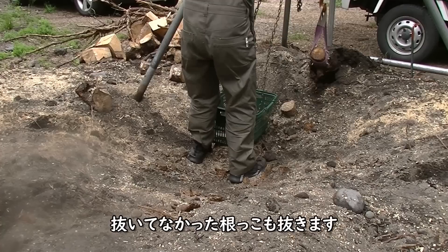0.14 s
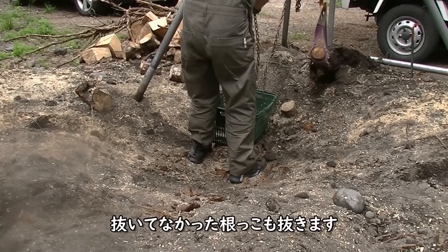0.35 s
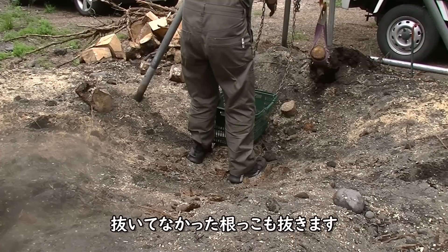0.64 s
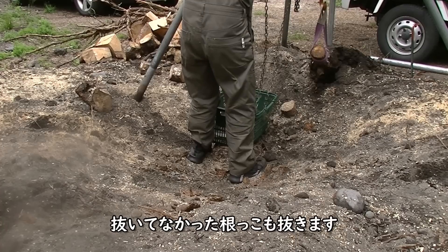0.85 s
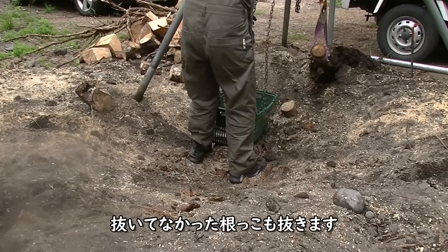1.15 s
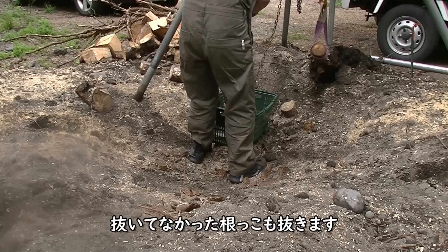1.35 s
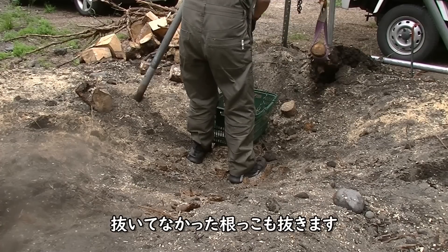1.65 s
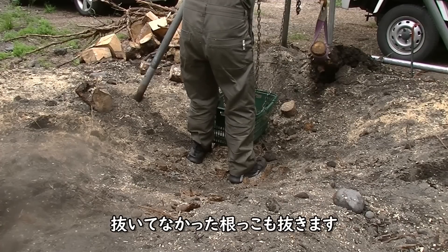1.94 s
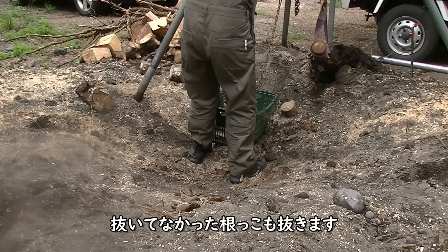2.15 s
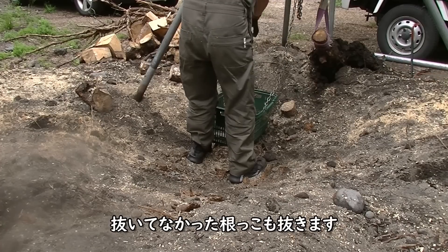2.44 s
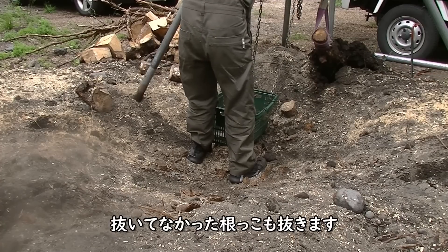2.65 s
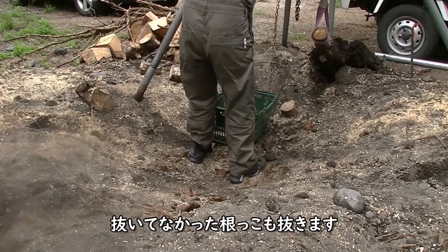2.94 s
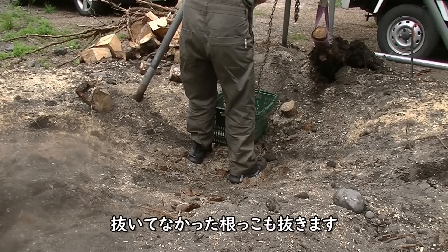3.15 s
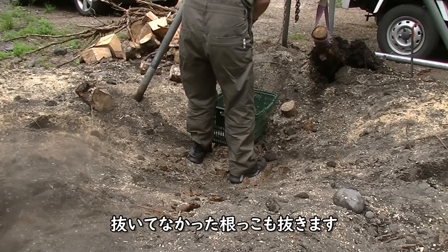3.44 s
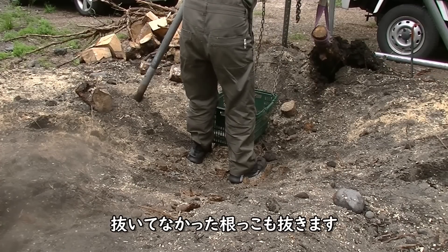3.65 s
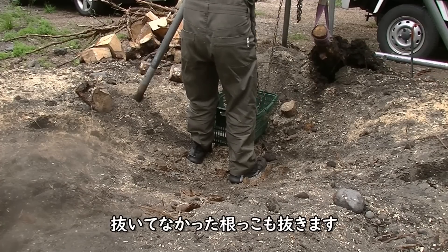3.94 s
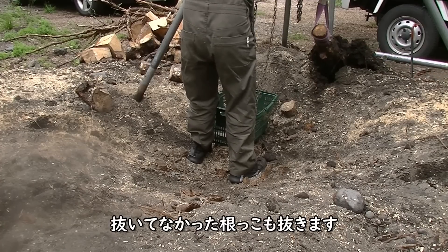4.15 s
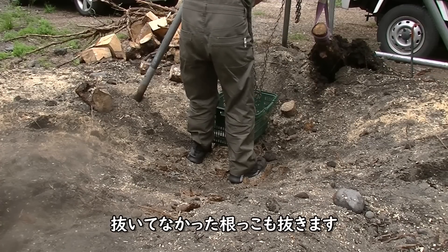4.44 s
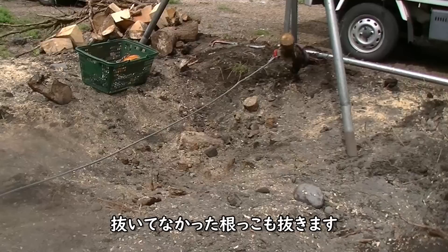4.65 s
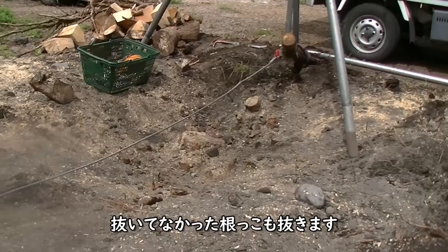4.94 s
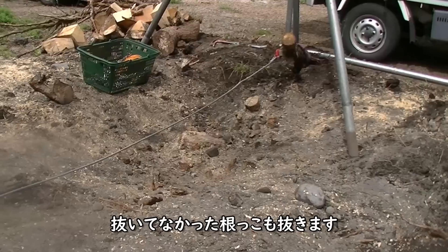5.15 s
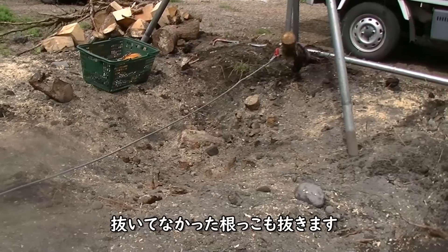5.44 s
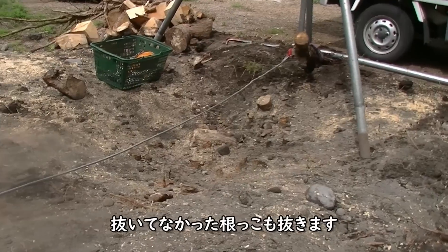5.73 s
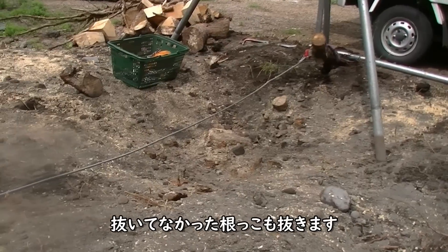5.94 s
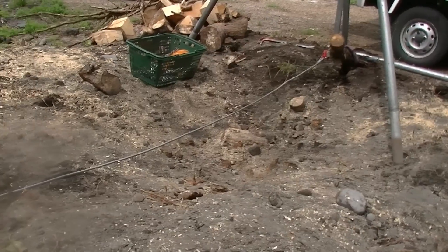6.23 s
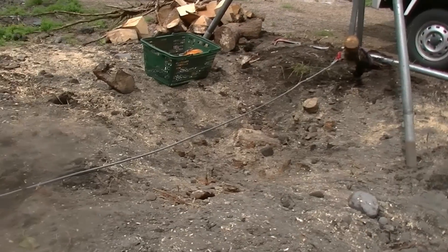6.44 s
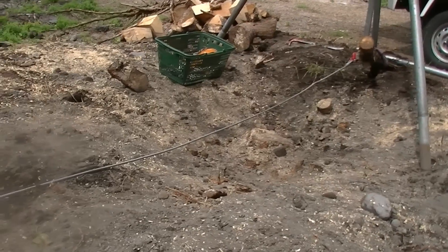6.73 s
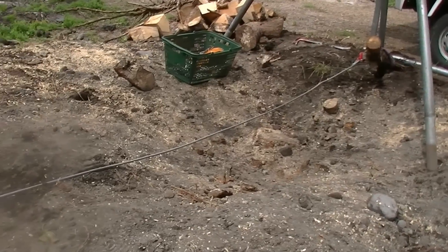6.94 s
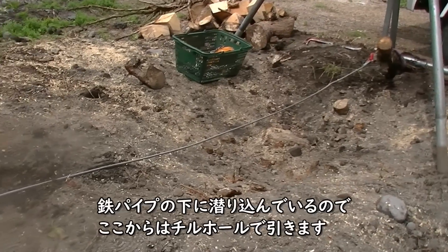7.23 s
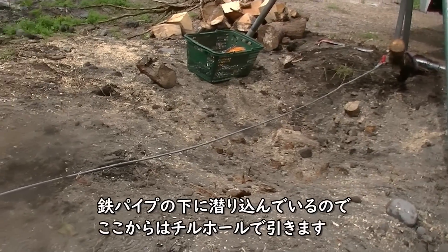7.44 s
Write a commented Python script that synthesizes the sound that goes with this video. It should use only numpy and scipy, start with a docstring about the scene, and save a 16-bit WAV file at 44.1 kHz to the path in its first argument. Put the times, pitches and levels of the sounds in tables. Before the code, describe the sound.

A hand chain hoist clatters close and centred in open air. A brief burst of ratchet clicks at 0-0.14 s cuts out for an instant, then another runs 0.17-0.5. Longer pulls follow at 0.64-1.5, 1.6-2.4, 2.5-3.4, 3.5-4.0 and 4.0-4.6, mostly starting slower, racing to around seventy clicks a second, then braking. Clicks are bright, dry and metallic, with a ringing casing and fine chain jingle. Hollow plastic knocks and dull soil thuds fall near 0.7, 2.5 and 2.9; links clack at 1.64 and 3.5. At 4.64 sound drops out briefly and the hoist rests. Soft air and insect chorus remain, with a scuff and thuds at 4.7-5.0, small clinks at 5.2-5.5, echoing bird warbles at 4.9, 5.4 and 6.1-6.7, a blurred cicada drone until 6.6, and a nearer, throbbing cicada swelling from 5.4 to the end at about 7.6. A very faint high whine persists.

```python
"""A pawl snaps fast over ratchet teeth as a hand chain block on a tripod is hauled, pull after pull.
It lifts a root from the soil at a wood's edge. Each tooth click shakes metallic noise and rings the casing;
chain links jingle as random taps on short rings, with thuds, knocks and clinks of shaped noise and rings.
Then the hoist rests, leaving cicadas (noise pulses and a blurred note), a far bird's echoed warbles,
and soft air with an insect chorus (coloured noise) and a faint steady whine."""
import sys
import numpy as np
from scipy import signal
from scipy.fft import rfft, irfft, next_fast_len
from scipy.io import wavfile
from scipy.ndimage import uniform_filter1d

SR = 44100
rng = np.random.default_rng(int(sys.argv[2]) if len(sys.argv) > 2 else 0)


def dump(signal):
    """Clip the signal to [-1, 1] and save it as 16-bit WAV at the path in sys.argv[1]."""
    limited = np.clip(np.atleast_2d(signal).T, -1, 1)
    pcm = np.round(limited * 32767).astype(np.int16)
    wavfile.write(sys.argv[1], SR, pcm)


N = 334719
TIME = np.arange(N) / SR

# pulls on the hand chain: start_s, end_s, first_speed [teeth/s], acceleration [teeth/s^2],
# top_speed [teeth/s], final_speed [teeth/s], pawl_db [relative], jingle_db [before the swing]
PULLS = [(0.001, 0.136, 57, 234, 74, 28.5, -1, -42.5), (0.168, 0.498, 60, 220, 60, 25.2, 0.65, -38.5),
         (0.639, 1.507, 17.4, 236, 76.6, 26.5, 0.45, -39.5), (1.585, 2.388, 6.14, 239, 82, 70, 0.1, -39.5),
         (2.474, 3.374, 13.3, 270, 80, 20, 0.5, -39.5), (3.461, 3.976, 9.6, 208, 74, 26, 0.2, -39),
         (4.010, 4.611, 39.8, 103, 71, 23.8, 0, -38.5)]
# resonances of casing and ratchet wheel: pitch_hz, width_hz, level_db [above the clatter around them]
CASING = [(1300, 45, 8), (1507, 55, 11), (1700, 60, 5), (1815, 50, 7), (2130, 45, 4), (2403, 48, 9),
          (2890, 90, 11), (2990, 90, 9), (3634, 45, 8), (3848, 55, 6), (4680, 110, 8), (5110, 130, 6),
          (5560, 50, 5), (5990, 130, 6), (6190, 90, 4), (6448, 65, 5), (6777, 70, 5), (6993, 80, 9),
          (7368, 70, 7), (7590, 45, 4), (8088, 65, 7), (8283, 45, 5), (8540, 150, 5), (9280, 95, 6),
          (9859, 32, 10), (10411, 48, 9), (11080, 240, 6), (11800, 130, 4), (12500, 140, 6),
          (14300, 110, 5)]
# colour of the casing's broad clatter: pitch_hz, level_db [relative, per Hz]
CLATTER = [(100, -29), (400, -13.5), (900, -9), (1150, -12), (2000, -4.5), (3400, -1.5), (4500, 2),
           (5600, 2.5), (7000, 2.5), (8800, 2.5), (9700, -0.5), (11100, 1), (13000, -2.5), (14600, -7.5),
           (15800, -12.5), (16200, -28.5)]
# hand chain links: pitch_hz, level_db [relative], t60_s [time to fade by 60 dB]
LINKS = [(4280, 11, 0.023), (4360, 18, 0.025), (4500, 20, 0.025), (4536, 20.5, 0.02), (4633, 21, 0.03),
         (4680, 16, 0.025), (5090, 17.5, 0.025)]
# moments when the whole sound drops out: start_s, end_s
SILENCES = [(0.14, .165), (4.642, 4.709)]


def from_db(db):
    """Turn decibels into a gain."""
    return 10 ** (np.asarray(db) / 20)


def rms_one(x):
    """Scale a sound to unit power."""
    return x / np.sqrt(np.mean(x ** 2) + 1e-20)


def in_time(rows):
    """Read a curve's columns at every sample."""
    s, *columns = np.transpose(rows)
    return [np.interp(TIME, s, column) for column in columns]


def colour(x, spectrum):
    """Filter by a smooth curve of pitch_hz, level_db."""
    hz, db = np.transpose(spectrum)
    size = next_fast_len(N)
    bins = np.maximum(np.fft.rfftfreq(size, 1 / SR), 1)
    gain = from_db(np.interp(np.log(bins), np.log(hz), db))
    return irfft(rfft(x, size) * gain, size)[:N]


def noise(spectrum):
    """Make coloured noise of unit power."""
    return rms_one(colour(rng.standard_normal(N), spectrum))


def high_pass(x, hz):
    """Take away the sound below a pitch."""
    return signal.sosfilt(signal.butter(2, hz, "high", fs=SR, output="sos"), x)


def resonate(x, hz, width_hz):
    """Keep a steep-sided band around a pitch, scaled to unit power."""
    edges = np.clip([hz - width_hz / 2, hz + width_hz / 2], 10, SR / 2 - 100)
    return rms_one(signal.sosfilt(signal.butter(2, edges, "band", fs=SR, output="sos"), x))


def ring(clicks, hz, t60):
    """Let each unit click start a fading sine whose starting height is 1."""
    decay = from_db(-60 / (t60 * SR))  # per sample
    turn = 2 * np.pi * hz / SR
    return signal.lfilter([0, np.sin(turn)], [1, -2 * decay * np.cos(turn), decay ** 2], clicks + 1e-18)


def drift(rate):
    """Wander by joining random points of spread 1, at a rate in points per second."""
    knots = rng.standard_normal(int(N / SR * rate) + 2)
    return np.interp(TIME * rate, np.arange(len(knots)), knots)


def fade(start, t60):
    """Stay silent until the start, then fade by 60 dB per t60, to a floor of -120 dB."""
    return (TIME >= start) * from_db(-60 * np.clip((TIME - start) / t60, 0, 2))


def stereo(mid, side):
    """Make left and right from middle and side."""
    return np.array([mid + side, mid - side])


def pull_at(times):
    """Find the time since the current pull began, with its pawl and jingle levels."""
    start, *_, pawl_db, jingle_db = np.transpose(PULLS)
    k = np.maximum(np.searchsorted(start, times, side="right") - 1, 0)
    return times - start[k], pawl_db[k], jingle_db[k]


def hoist(swing_db=-57, side_db=-16.0, echo_db=-42, echo_s=.011):
    """Pawl, casing, chain and the rustle of its hanging loop, with a faint echo at the side."""
    # the hoist's working sounds stop briefly, all but the rustle: start_s, end_s
    hushed = [(2.401, 2.472)]
    # colour of the sideways copy: pitch_hz, level_db [relative]
    side_colour = [(60, -1), (92, 4), (140, -4.5), (210, -13), (330, -24), (500, -20), (770, -44),
                   (1170, -60), (1790, -67), (2740, -46), (4190, -7), (6410, -2.5), (9810, -36),
                   (15000, -58)]
    teeth = tooth_times()
    sounding = 1 - sum((TIME > a) & (TIME < b) for a, b in hushed)
    rustle = colour(casing_noise(), [(3000, 10.0), (6000, 5.5), (12000, -1.5), (16000, -4)])
    working = pawl(teeth) + hand_chain(teeth) + casing_ring(teeth)
    # the hoist rests from the last dropout on
    sound = (working * sounding + from_db(swing_db) * rustle) * (TIME < SILENCES[-1][0])
    # a coloured copy shifted by a quarter cycle goes to the side
    skew = signal.hilbert(colour(sound, side_colour), next_fast_len(N))[:N].imag
    echo = np.interp(TIME - echo_s, TIME, sound)
    side = from_db(side_db) * skew + from_db(echo_db) * echo
    return stereo(sound, side) * from_db([[-.15], [.15]])


def tooth_times(unsteady=.1, unsteady_per_s=25, tire_teeth_per_s2=45, brake_teeth_per_s2=400):
    """Each pull speeds the wheel up evenly, tires, then brakes sharply; the pawl clicks once per tooth."""
    times = []
    wobble = 1 + unsteady * drift(unsteady_per_s)
    for start, end, first, acceleration, top, final, _, _ in PULLS:
        during = (TIME >= start) & (TIME <= end)
        age, length = TIME[during] - start, end - start
        # the three stages of a pull; the slowest one rules
        speeding = first + acceleration * age
        tiring = (top - tire_teeth_per_s2 * (age - (top - first) / acceleration)) * wobble[during]
        braking = final + brake_teeth_per_s2 * (length - age)
        speed = np.min([speeding, tiring, braking], axis=0)
        turned = np.cumsum(np.maximum(speed, 1)) / SR
        # the middle of the pull gives or takes a little, so that it ends on a tooth
        count = round(turned[-1])
        turned = turned + (count - turned[-1]) * np.clip(3 * age / length - 1, 0, 1)
        times += list(np.interp(np.arange(count + 1), turned, age + start))
    return np.array(times)


def pawl(teeth, level_db=-31.5, crack_db=-13.0, crack_s=0.00028, buzz_s=0.02,
         sag_db_per_s=270, die_db_per_s=1200, slow_db=1.5, scatter_db=.5, grain_db=1.1,
         tilt_db=0.5, dull_db_per_s=110, bright_hz=7000, low_cut_hz=260,
         ease_after_s=0.59, ease_db_per_s=5.5):
    """The pawl drops with a crack, buzzes and dies away, unless the next tooth lifts it first."""
    gaps = np.clip(np.diff(teeth, prepend=-1), .01, .07)
    since, pull_db, _ = pull_at(teeth)
    # late in a long pull the pawl falls more softly
    easing = ease_db_per_s * np.maximum(since - ease_after_s, 0)
    # a slow tooth lets the pawl fall harder
    slowness = slow_db * np.log(gaps / 0.029)
    force = from_db(pull_db - easing + slowness + rng.normal(0, scatter_db, len(teeth)))
    last = np.searchsorted(teeth, TIME, side="right") - 1
    age = np.minimum(np.abs(TIME - teeth[last]), 1)
    buzz = from_db(-sag_db_per_s * age - die_db_per_s * np.maximum(age - buzz_s, 0))
    crack = from_db(crack_db) * np.exp(-age / crack_s)
    contact = uniform_filter1d(force[last] * buzz * (1 + crack), size=24)
    metal = casing_noise()
    low = signal.sosfiltfilt(signal.butter(2, bright_hz, fs=SR, output="sos"), metal)
    # each tooth has its own brightness; the treble fades first while the casing takes a moment to swell
    bright = from_db(rng.normal(1, tilt_db, len(teeth))[last] - dull_db_per_s * age)
    swell = 1 - 0.54 * np.exp(-age / 0.0028)
    grain = from_db(level_db + grain_db * drift(1500))
    clatter = (low * swell + (metal - low) * bright) * contact * grain
    # the small casing radiates little bass
    return high_pass(clatter, low_cut_hz)


def casing_noise():
    """Dense metallic rattle, with the casing's resonances standing out of it."""
    size = next_fast_len(N)
    bins = np.fft.rfftfreq(size, 1 / SR)
    power = 1
    for hz, width, db in CASING:
        power = power + (from_db(db) ** 2 - 1) / (1 + ((bins - hz) / width * 2) ** 2) ** 1.5
    return rms_one(irfft(rfft(noise(CLATTER), size) * np.sqrt(np.abs(power)), size)[:N])


def casing_ring(teeth, level_db=-93, spread_db=5.0, linger=1.25, low_cut_hz=500):
    """Every drop of the pawl also strikes the casing's modes, each with a strength of its own."""
    at, out = np.clip((teeth * SR).astype(int), 0, N - 1), 0
    chance = rng.standard_normal((len(at), len(CASING), 2))
    for k, (hz, width, db) in enumerate(CASING):
        mode_db = level_db + db + np.interp(hz, *np.transpose(CLATTER))
        scatter = spread_db * np.minimum(chance[:, k, 0], 2)
        blows = np.zeros(N)
        blows[at] = from_db(mode_db + scatter) * np.sign(chance[:, k, 1])
        # a narrow resonance rings longer
        t60 = linger * np.log(1000) / (np.pi * width)
        out = out + width * ring(blows, hz, t60)
    return high_pass(out, low_cut_hz)


def hand_chain(teeth, taps_per_s=45, spread_db=6.0, brisk_teeth_per_s=58, speed_power=1.62,
               detune=0.01, low_cut_hz=1800, swing_at_s=0.54, swing_width_s=0.17, swing_db=3):
    """Links tap each other at slightly different pitches, harder the faster the wheel feeds them."""
    tooth = np.clip(np.searchsorted(teeth, TIME) - 1, 0, len(teeth) - 2)
    gap = np.diff(teeth)[tooth]
    speed = uniform_filter1d(1 / np.maximum(gap, .005), size=700)
    out = 0
    for hz, db, t60 in LINKS:
        for offset in (-1, 0, 1):
            at, taps = np.flatnonzero(rng.random(N) < taps_per_s / SR), np.zeros(N)
            strength = from_db(db + rng.normal(0, spread_db, len(at)))
            taps[at] = strength * rng.choice([-1, 1], len(at))
            out = out + ring(taps, hz * (1 + detune * offset), t60)
    out = high_pass(out, low_cut_hz)
    age, _, jingle_db = pull_at(TIME)
    # the chain loop swings most some way into a pull
    swing = np.exp(-.5 * ((age - swing_at_s) / swing_width_s) ** 2)
    briskness = np.minimum(speed / brisk_teeth_per_s, 1) ** speed_power
    return rms_one(out) * from_db(jingle_db + swing_db * swing) * briskness


def link_clacks(t60=0.027, spread_hz=900):
    """As the hand lets go and grips again, links hit: short noise bursts around the links' mean pitch."""
    # single clacks: start_s, level_db
    clacks = [(1.643, -39), (3.409, -38), (3.497, -47), (3.507, -46), (3.520, -33.5)]
    pitch_hz = np.mean([hz for hz, _, _ in LINKS])
    burst = resonate(rng.standard_normal(N), pitch_hz, spread_hz)
    return burst * sum(from_db(db) * fade(s, t60) for s, db in clacks)


def basket_knocks(t60=0.043):
    """The hand chain knocks the plastic basket: quickly fading noise through its hollow resonances."""
    # knocks: start_s, level_db [relative]
    knocks = [(0.674, -45), (1.069, -40), (2.5, -33), (2.516, -42), (2.928, -41), (3.638, -39)]
    # the basket's hollow ring: pitch_hz, width_hz, level_db [relative]
    basket = [(600, 320, -11.5), (930, 185, -4.5), (1250, 280, -2), (2799, 1600, -1)]
    white = rng.standard_normal(N)
    body = sum(from_db(db) * resonate(white, hz, width) for hz, width, db in basket)
    return body * sum(from_db(db) * fade(s, t60) for s, db in knocks)


def clinks(t60=.08):
    """The slack tackle shifts: each clink is a burst of noise that also rings the tripod."""
    # clinks: start_s, level_db [relative]
    shifts = [(5.201, -47), (5.399, -49), (5.459, -55), (5.484, -55)]
    # colour of the bursts: pitch_hz, level_db [relative]
    burst_colour = [(40, -16), (200, 4.5), (1300, 6.5), (4000, 5), (6000, -6), (11000, -5.5), (16000, -17)]
    # tripod rings: pitch_hz, level_db [relative to the clink], t60_s
    tripod_modes = [(104, -21, .6), (1140, -16, .4), (1225, 0.5, .04), (1550, -6, .03)]
    blows = np.zeros(N)
    for s, db in shifts:
        blows[int(s * SR)] = from_db(db)
    tripod = sum(from_db(db) * ring(blows, hz, ring_s) for hz, db, ring_s in tripod_modes)
    return tripod + noise(burst_colour) * sum(from_db(db) * fade(s, t60) for s, db in shifts)


def thuds(level_db=-2.5, width_share=0.75, push_s=.0026, crumble_db=-7, crumble_t60=0.11):
    """Root and boots thud on the soil: one dull push, then a short noisy crumbling."""
    # thuds: start_s, level_db [relative], pitch_hz
    soil_thuds = [(0.676, -50.5, 261), (1.692, -47, 268), (2.46, -36.5, 325), (2.560, -47, 404),
                  (2.926, -41, 213.8), (4.251, -49, 320), (4.341, -47, 357.3), (4.735, -52.5, 200),
                  (4.900, -43, 261), (4.969, -56, 240), (5.025, -53, 280)]
    white, out = rng.standard_normal(N), 0
    for s, db, hz in soil_thuds:
        edges = hz * np.exp(np.array([-.5, .5]) * width_share)
        force = from_db(crumble_db) * white * fade(s, crumble_t60)
        force[int(s * SR)] += np.sqrt(push_s * SR)
        body = signal.butter(2, edges, "band", fs=SR, output="sos")
        # a wider band lets more noise through, so even that out
        evened = signal.sosfilt(body, force + 1e-18) / np.sqrt(2 * np.diff(edges) / SR)
        out = out + from_db(db + level_db) * evened
    return out


def scuff(start_s=4.732, level_db=-56.5, t60_s=0.85):
    """A boot scuffs loose soil: a dull rustle of fading noise."""
    soil = noise([(60, -14), (200, 2), (700, 1), (2000, -10), (7000, -21), (16000, -36)])
    return from_db(level_db) * fade(start_s, t60_s) * soil


def rattling_cicada(buckles_per_s=248, throbs_per_s=7.5, first_throb_s=6.3, side_db=-11, pan_db=0.0,
                    start_s=5.44, level_db=-57, swell_db_per_s=4.5):
    """A near cicada swells: tymbal buckles pulse noise through its abdomen, which throbs in syllables."""
    # its abdomen: pitch_hz, width_hz, level_db [relative], dip_depth [0-1, between syllables]
    abdomen = [(1425, 92, -20, 0.2), (2941, 112, -1, 0.3), (3046, 93, 0, 0.35), (3163, 207, -4.5, 0.25),
               (4470, 80, -21, 0.4), (4640, 310, -19.5, .6), (6110, 310, -21.5, 0.7), (6340, 390, -27, 1),
               (7500, 310, -27.5, 0.8), (7780, 240, -25, 1), (9300, 460, -29, 0.9),
               (11000, 1200, -32.5, 0.8)]
    cycle = np.cumsum(buckles_per_s * (1 + 0.057 * drift(60))) / SR % 1
    # the pulses are smeared into each other: noise never stops between them
    pulses = rng.standard_normal((2, N)) * (0.75 + np.exp(-cycle / 0.43))
    dip = np.sin(np.pi * throbs_per_s * (TIME - first_throb_s) + 0.21 * drift(5)) ** 2
    song = 0
    for hz, width, db, depth in abdomen:
        syllables = 1 - np.clip(depth, 0, 1) * dip ** 2 * (0.55 + 0.23 * drift(25))
        song = song + from_db(db) * resonate(pulses, hz, width) * syllables
    mid, side = song
    loudness = from_db(level_db + swell_db_per_s * (TIME - start_s)) * (TIME > start_s)
    return stereo(mid, from_db(side_db) * side) * loudness * from_db([[pan_db / 2], [-pan_db / 2]])


def droning_cicada(blur_hz=55, blur=0.95, pan_db=1.0, level_db=0.5):
    """A second cicada's held note sinks at its end, blurred by many paths through the trees."""
    # its drawn-out note: time_s, pitch_hz, level_db [relative]
    drone = [(4.77, 2080, -65), (4.806, 2217, -61), (5.25, 2203, -60), (5.494, 2202, -75),
             (5.784, 2219, -55), (6.168, 2230, -51.5), (6.256, 2173, -60), (6.546, 2142, -57),
             (6.63, 2150, -72)]
    hz, db = in_time(drone)
    phase = 2 * np.pi * np.cumsum(hz) / SR
    # random strengths of sine and cosine blur both loudness and pitch
    note = (1 + blur * drift(2 * blur_hz)) * np.sin(phase) + blur * drift(2 * blur_hz) * np.cos(phase)
    side = 0.47 * drift(blur_hz) * np.cos(phase)
    singing = (TIME > SILENCES[-1][1]) & (TIME < drone[-1][0])
    pan = from_db([[pan_db / 2], [-pan_db / 2]])
    return stereo(note, side) * from_db(db + level_db) * singing * pan


def far_bird(warble_per_s=300, warble_depth=0.075, wood_t60=0.62, level_db=7.0):
    """Short sine warbles, heard only through the wood's echoes, which are fading noise tails."""
    # calls: middle_s, pitch_hz, spread_s [of the bell-shaped loudness], level_db [relative]
    calls = [(4.946, 3880, 0.023, -62), (5.401, 4400, 0.032, -59.5), (6.11, 3950, 0.025, -68),
             (6.326, 3870, 0.033, -58), (6.707, 4400, 0.012, -59.5)]
    notes, warble = 0, 1 + warble_depth * drift(warble_per_s)
    for s, hz, spread, db in calls:
        bell = np.exp(-.5 * ((TIME - s) / spread) ** 2)
        notes = notes + from_db(db) * bell * np.sin(2 * np.pi * np.cumsum(hz * warble) / SR)
    tails = rng.standard_normal((2, SR // 2)) * fade(0, wood_t60)[:SR // 2]
    mid, side = [signal.fftconvolve(notes, tail / np.linalg.norm(tail))[:N] for tail in tails]
    return stereo(mid, 0.3 * side) * from_db(level_db)


def air_and_chorus():
    """Soft air and a far insect chorus, each coloured noise with a slowly changing level."""
    # colours of air and chorus: pitch_hz, level_db [relative, per Hz]
    air_colour, chorus_colour = [(20, -5), (60, -0.5), (150, 4), (300, 4.5), (600, 2.5), (1100, 0.5),
                                 (3000, 4.5), (6000, -14.5), (10000, -16.5), (13000, -19), (16000, -27)], [(1000, -25), (1450, -2), (1900, -4), (2500, -2), (2900, 3),
                                              (3150, 6), (3500, -15.5), (4500, -13), (5500, -20),
                                              (9000, -28.5), (16000, -45)]
    # their levels: time_s, level_db
    air_level, chorus_level = [(0, -64), (7.2, -64), (7.59, -61)], [(0.6, -82), (4.6, -63.5), (4.8, -58.5), (6.6, -58.5),
                                               (7.2, -67)]
    # width of the background: pitch_hz, level_db [side against middle]
    side_width = [(60, -7), (100, -10), (180, -7.5), (310, -8), (550, -9), (950, -11), (1650, -20),
                  (2860, -16), (4970, -5.5), (8640, -15), (15000, -13)]
    (air_db,), (chorus_db,) = in_time(air_level), in_time(chorus_level)
    mid, side = [from_db(air_db) * noise(air_colour) + from_db(chorus_db) * noise(chorus_colour)
                 for _ in range(2)]
    return stereo(mid, colour(side, side_width))


def whine(pitch_hz=14290, level_db=-84):
    """A faint, high, steady sine."""
    return from_db(level_db) * np.sin(2 * np.pi * pitch_hz * TIME)


def scene():
    """The hoist stands straight ahead, with the wood all round."""
    work = hoist() + link_clacks() + basket_knocks() + clinks() + thuds() + scuff()
    return work + rattling_cicada() + droning_cicada() + far_bird() + air_and_chorus() + whine()


def record(dry, limit_db=-25.0, squeeze=.7, cutoff_hz=16100):
    """A fast limiter evens out the hardest clicks, the sound drops out twice, and the top is cut."""
    power = uniform_filter1d(np.mean(dry ** 2, axis=0), size=130)
    level_db = 10 * np.log10(np.abs(power) + 1e-12)
    excess_db = uniform_filter1d(np.maximum(level_db - limit_db, 0), size=64)
    gain = from_db(-np.clip(squeeze, 0, 1) * excess_db)
    live = 1. - sum((TIME > a) & (TIME < b) for a, b in SILENCES)
    top_cut = signal.ellip(12, .1, 80, cutoff_hz, fs=SR, output="sos")
    return signal.sosfilt(top_cut, dry * gain * uniform_filter1d(live, size=64))


dry = scene()
out = record(dry)
dump(out)
```